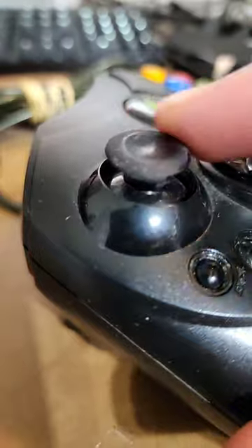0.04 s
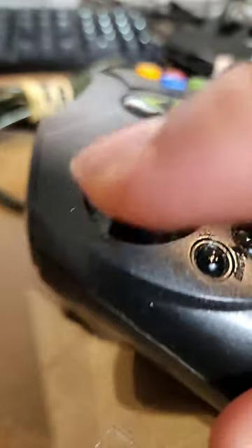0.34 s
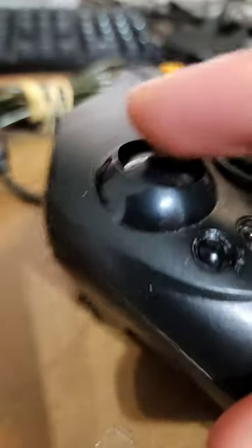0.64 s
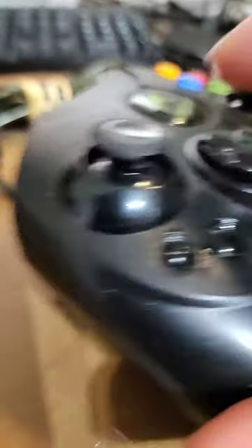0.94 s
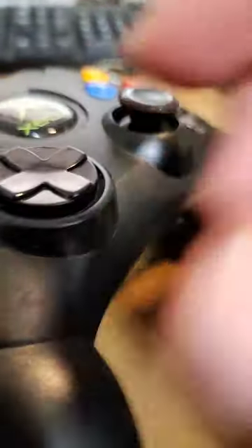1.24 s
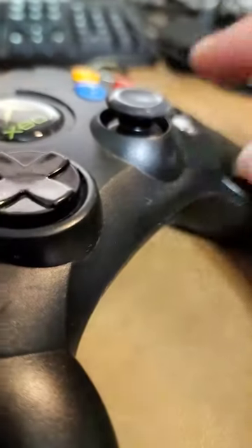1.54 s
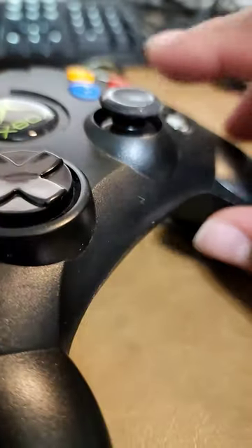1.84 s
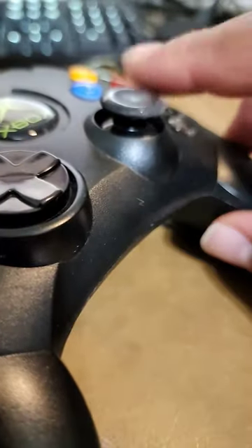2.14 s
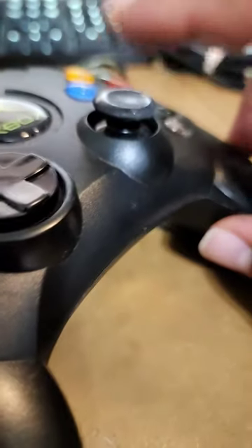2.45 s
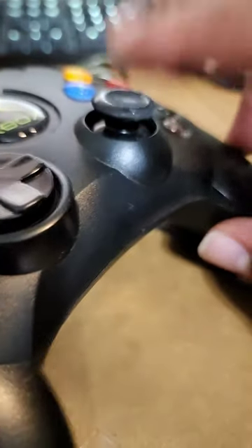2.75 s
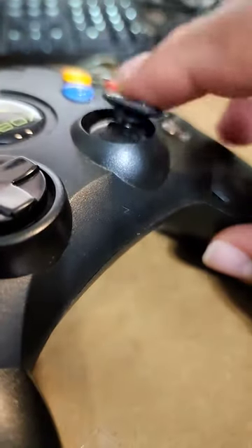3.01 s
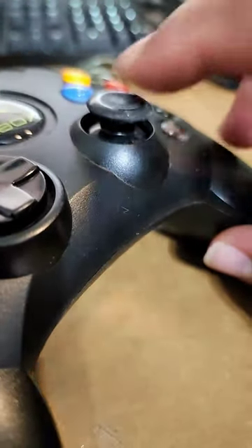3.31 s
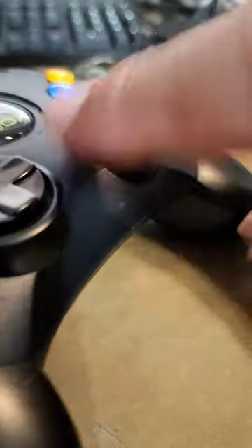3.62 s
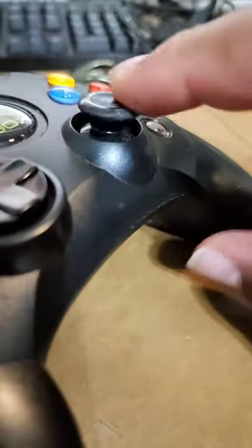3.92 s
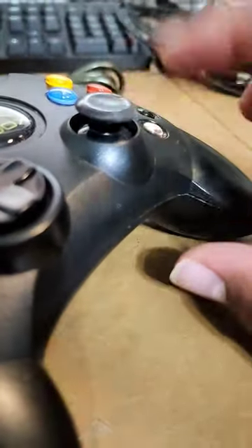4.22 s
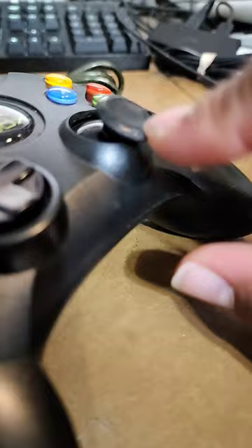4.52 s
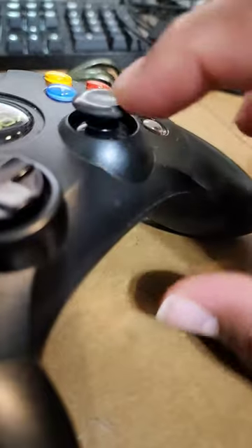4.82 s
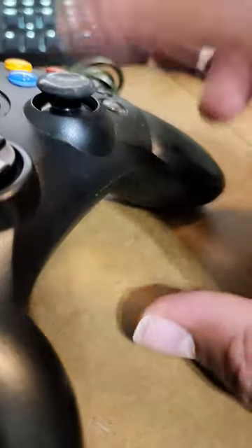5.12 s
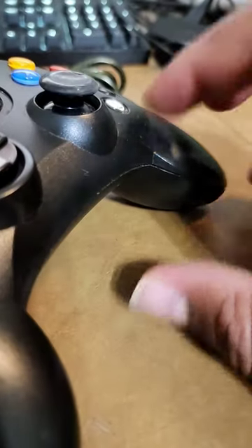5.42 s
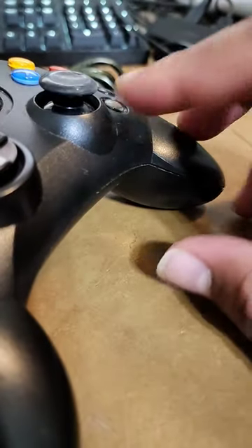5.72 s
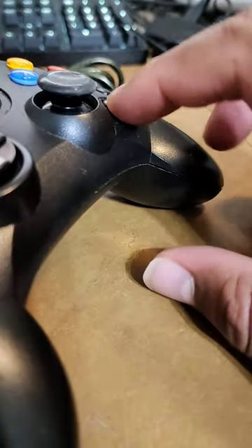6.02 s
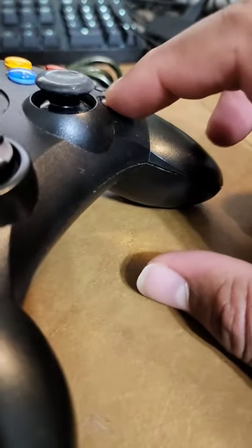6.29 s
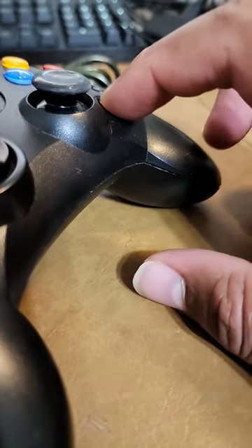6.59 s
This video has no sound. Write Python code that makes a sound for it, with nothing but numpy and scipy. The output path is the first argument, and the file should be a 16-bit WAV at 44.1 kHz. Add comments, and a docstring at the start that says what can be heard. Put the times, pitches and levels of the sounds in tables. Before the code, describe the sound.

A game controller is handled on a desk, close to a stereo microphone, in a quiet room with faint air noise and mains hum. At about 0.2 and 0.6 seconds a finger pushes a thumbstick with a short plastic clack; a little over a tenth of a second later, the stick snaps back with a tight chatter and a tiny spring ring. Light desk thumps accompany these. From 1 to 3 seconds it is much quieter: skin rubs and hisses over the casing, with a faint low rumble and a few soft hollow knocks. Five more push and release pairs come at about 3.1, 3.6, 4.1, 4.5 and 5.1 seconds, slightly left of centre, varying a little in pitch, the fourth strongest. The hand slides and scuffs softly until about 5.7 seconds. Between 6 and 6.3 seconds, finger and nail lightly tap the casing a few times.

```python
"""A game controller on a desk in a quiet room, close to a stereo microphone, over faint mains hum.
In the first second a finger pushes a thumbstick twice: each push clacks the plastic shell, and on each
release the sprung stick flies back and chatters. From 1 to 3 s skin rubs over the shell and the
controller knocks lightly on the desk. Five more pushes and releases follow from 3 to 5.2 s.
The hand then slides to a new hold, and just after 6 s finger and nail tap the casing."""
import sys
import numpy as np
from scipy import signal
from scipy.fft import rfft, irfft
from scipy.io import wavfile
from scipy.ndimage import uniform_filter1d

SR = 44100
rng = np.random.default_rng(int(sys.argv[2]) if len(sys.argv) > 2 else 0)


def inscribe(sig):
    """Save sig as 16-bit PCM at rate SR to the path in sys.argv[1].

    A 1-D sig is mono; a 2-D sig holds one channel per row.
    Samples are clipped to [-1, 1] before scaling.
    """
    pcm = np.round(np.clip(np.atleast_2d(sig).T, -1, 1) * 32767)
    wavfile.write(sys.argv[1], SR, pcm.astype(np.int16))


N = 297675

# Table levels are relative. Bands: low 650-1300 Hz, body to 2800 Hz, crack to 9500 Hz, tick above.
# stick pushes: (time [s], low [dB], body [dB], crack [dB], tick [dB], left-right [dB], pitch [ratio])
PUSHES = [(0.1701, -33.5, -22.5, -25.5, -35.5, -0.5, 1.19), (0.6118, -39.5, -18, -19.5, -35, -1, 1.25),
          (3.0701, -37, -25, -31, -55, 0.5, 1.085), (3.6024, -57, -27, -31, -52, 2.5, 1.14),
          (4.0743, -32.5, -22.5, -32.5, -52, 4, 0.903), (4.5208, -28, -16.5, -24, -32.5, 3.5, 1.06),
          (5.059, -38.5, -20, -27.5, -32.5, 4.5, 1.12)]
# finger and nail taps on the casing: columns as PUSHES
TAPS = [(.121, -55.5, -56, -60, -54, 2, 0.97), (0.2171, -53, -52, -61, -59, -1, 1),
        (0.7394, -52, -54, -48, -49, 1, 0.96), (2.052, -63, -59, -61.5, -80, 3.5, 0.98),
        (3.5532, -40, -44, -47.5, -35, 1.5, 1), (4.4815, -68, -51.5, -80, -67, 6, 0.86),
        (6.011, -56, -62.5, -61, -62, -4, 1), (6.0797, -62, -62, -56, -37, 7, 1),
        (6.0833, -41.5, -56, -46, -38.5, 8, 0.93), (6.1224, -36.5, -41.5, -43.5, -44, -0.5, 0.89),
        (6.2724, -38.5, -47.5, -44, -39, -1.5, 1)]
# stick releases: (columns as PUSHES, slip-off [dB re main hit], first bounce [dB re main hit],
# first bounce delay [s], scrape [dB], spring [dB], spring pitch [Hz])
RELEASES = [(0.2805, -42, -32, -30.5, -23, 1.5, 1.096, -8, -19, 0.0072, -45.5, -37.5, 2320),
            (0.7644, -36.5, -30, -37, -30.5, 3, 1.055, -7, 2.5, 0.0068, -44.5, -29, 2327),
            (3.1686, -31.5, -23, -28.5, -25.5, 5.5, 1.004, -25, -6, 0.0089, -44.5, -33, 1975),
            (3.6881, -35, -25, -35, -30, 4.5, .99, -31, -6, 0.0067, -54, -39, 1960),
            (4.1722, -33.5, -21.5, -35, -31.5, 4, .9, -9, -4, .0073, -38, -36.5, 1535),
            (4.6262, -39, -22, -34, -28, 4.5, .96, -16, -4.5, 0.0071, -45, -35, 2010),
            (5.1751, -36, -26, -34.5, -34, 6, 0.93, -24, -2, .0038, -50, -47, 2000)]
# controller on desk: (time [s], thump [dB], knock [dB], knock pitch [Hz])
KNOCKS = [(.216, -55, -45, 680), (0.2881, -34.5, -34, 534), (.318, -38.5, -48, 500), (.611, -49, -48, 241),
          (.852, -63, -52, 755), (1.197, -53.5, -43, 630), (2.519, -56.5, -54.5, 346),
          (2.737, -59, -43, 242), (2.796, -59, -50, 327), (3.5531, -36.5, -34.5, 560),
          (5.061, -58, -45.5, 197), (5.088, -63, -48.5, 557)]
# dense casing modes: (frequency [Hz], level [dB])
GRIT = [(400, 2.5), (750, -13.5), (1100, 7.5), (1800, 6.5), (3000, -6), (5000, -12), (9000, -20.5),
        (12500, -10), (15000, -28.5), (16200, -20)]


def amp(db):
    """Decibels to gain."""
    return 10 ** (np.asarray(db) / 20)


def unit(x):
    """Scale to rms 1."""
    return x / np.sqrt(np.mean(x ** 2) + 1e-20)


def pan(db):
    """Stereo gains for a left-right difference."""
    return amp(np.array([[.5], [-.5]]) * db)


def read(points, hz):
    """Interpolate on a log-frequency axis."""
    f, value = np.transpose(points)
    return np.interp(np.log(hz + 1), np.log(f + 1), value)


def add(mix, s, sound):
    """Mix in a stereo sound at time s."""
    part = mix[:, max(round(s * SR), 0):][:, :sound.shape[1]]
    part += sound[:, :part.shape[1]]


def coloured(points, size):
    """Stereo noise of a given spectrum, alike on both sides in the bass."""
    coherence = [(60, 0.85), (200, 0.79), (400, 0.5), (750, 0.048), (1300, 0.019), (16000, 0)]  # (frequency [Hz], left-right coherence [ratio])
    hz = np.fft.rfftfreq(size, 1 / SR)
    left, other = rfft(rng.standard_normal((2, size)))
    same = np.clip(read(coherence, hz), -1, 1)
    right = same * left + np.sqrt(1 - same ** 2) * other
    return unit(irfft(np.array([left, right]) * amp(read(points, hz)), size))


def flutter(depth_db, samples):
    """Random gain, rms 1, smoothed over the given span."""
    drift = unit(uniform_filter1d(rng.standard_normal(N), size=samples))
    return unit(amp(depth_db * np.tanh(drift)))


def background(air_db=-57.5, waver_db=1.7):
    """Steady room air and wavering mains hum."""
    air_colour = [(15, -50), (27, -27), (42, 5), (60, -21), (82, -12), (150, -10), (220, -13.5),
                  (310, -12.5), (520, -22.5), (850, -24), (1300, -18.5), (1850, -14.5), (2600, -26),
                  (3600, -35), (6000, -39.5), (9800, -44), (12600, -30), (15300, -45), (16000, -41)]  # (frequency [Hz], density [dB])
    hum_partials = [(59.9, -63), (119.8, -56.5), (239.6, -70)]  # (frequency [Hz], level [dB])
    t = np.arange(N) / SR
    waver = np.interp(t, np.linspace(0, t[-1], num=28), rng.standard_normal(size=28))
    hum = sum(amp(db) * np.sqrt(2) * np.sin(2 * np.pi * (f * t + rng.random())) for f, db in hum_partials)
    air = amp(air_db) * pan(1) * coloured(air_colour, N)
    return air + hum * amp(waver_db * waver) * amp([[2.5], [-3.5]])


def rumble():
    """Lumpy low rumble as the hand works on the desk."""
    colour = [(18, -26.5), (35, 6.5), (55, 5.5), (80, -16), (150, -8.5), (230, -16), (500, -38),
              (2000, -88)]  # (frequency [Hz], level [dB])
    envelope = [(0, -74), (.62, -54), (1.3, -62), (1.75, -55), (2.3, -58.5), (2.9, -69), (3.7, -61),
                (4.7, -55.5), (5.1, -64), (6.75, -75)]  # (time [s], level [dB])
    level_db = np.interp(np.arange(N) / SR, *np.transpose(envelope))
    lumps = flutter(depth_db=5, samples=2400)
    return coloured(colour, N) * lumps * amp(level_db) * pan(-.5)


def friction(strokes, colour, grain_db, gain_db, pan_db):
    """Surfaces catch and slip: grainy noise per stroke (peak [s], rise [s], fall [s], level [dB])."""
    t, speed = np.arange(N) / SR, np.zeros(N)
    for s, rise_s, fall_s, db in strokes:
        width_s = np.where(t < s, rise_s, fall_s)
        speed += amp(db) * np.exp(-.5 * np.minimum(((t - s) / width_s) ** 2, 20))
    return speed * flutter(grain_db, samples=160) * coloured(colour, N) * amp(gain_db) * pan(pan_db)


def hand(brush_rise=.73):
    """Slides rustle and rub through the casing, fingertips scuff it; skin hisses in both."""
    # changes of hold: (peak [s], rise [s], fall [s], rustle [dB], rub [dB], hiss [dB])
    slides = [(.37, 0.032, .055, -69, -57.5, -70), (1.16, 0.11, 0.1, -51, -66, -58.5),
              (1.34, 0.019, .048, -67, -70, -65), (1.51, 0.039, 0.1, -63.5, -55, -53.5),
              (1.75, .015, 0.056, -68, -58.5, -62), (5.14, 0.059, 0.071, -60, -68, -60),
              (5.315, 0.024, 0.026, -72, -59, -61.5), (5.415, 0.031, 0.062, -72, -58, -61)]
    # fingertip on shell: (peak [s], fall [s], scuff [dB], hiss [dB])
    brushes = [(2.52, 0.015, -66, -60.5), (2.64, 0.021, -55, -62.5), (2.81, 0.02, -68, -62),
               (3.289, 0.0084, -70, -61.5), (3.538, 0.056, -58, -65), (5.586, .006, -53, -71.5),
               (5.619, 0.017, -52, -65)]
    # friction spectra: (frequency [Hz], level [dB])
    rustle_colour = [(150, -16), (400, -4.5), (700, -2), (1200, -6.5), (2200, -10), (4000, -16.5),
                     (7000, -27.5), (16000, -27)]
    scuff_colour = [(400, -8.5), (850, -16.5), (1150, 3.5), (1800, -2), (3000, -15.5), (7000, -29.5),
                    (16000, -40)]
    rub_colour = [(90, -14), (200, -1), (350, 1.5), (500, -8.5), (800, -15), (2000, -15), (5000, -38.5)]
    hiss_colour = [(500, -20), (1500, -9), (4000, -15.5), (7000, -19), (10000, -17.5), (11500, 0.5),
                   (12700, 3.5), (15200, -4), (16000, -32)]
    rustles = [(*shape, db) for *shape, db, _, _ in slides]
    rubs = [(*shape, db) for *shape, _, db, _ in slides]
    scuffs = [(s, brush_rise * fall_s, fall_s, db) for s, fall_s, db, _ in brushes]
    hisses = [(*shape, db) for *shape, _, _, db in slides]
    hisses += [(s, brush_rise * fall_s, fall_s, db) for s, fall_s, _, db in brushes]
    return (friction(rustles, rustle_colour, grain_db=3, gain_db=0, pan_db=1.5)
            + friction(scuffs, scuff_colour, grain_db=6, gain_db=2.5, pan_db=5)
            + friction(rubs, rub_colour, grain_db=2.5, gain_db=3.5, pan_db=-1.5)
            + friction(hisses, hiss_colour, grain_db=3.5, gain_db=-2.1, pan_db=-15.5))


def scraping(push_db=-32.5, rattle_db=-14.5):
    """Plastic on plastic: stick in socket at each push and release, casing rattle at each knock."""
    strokes = [(s + .036, .016, .03, body_db + push_db) for s, _, body_db, *_ in PUSHES]
    strokes += [(s + .001, .01, .024, db) for s, *_, db, _, _ in RELEASES]
    strokes += [(s, .008, .025, thump_db + rattle_db) for s, thump_db, *_ in KNOCKS]
    return friction(strokes, GRIT, grain_db=5.5, gain_db=-1.5, pan_db=2.5)


def jolts():
    """Releases and taps jolt the desk in proportion to their low band; rows as KNOCKS."""
    return ([(s + .008, low_db - 21, low_db - 16, 580) for s, low_db, *_ in RELEASES]
            + [(s, low_db - 21, low_db - 11.5, 610) for s, low_db, *_ in TAPS])


def desk(knock_t60_s=.044, thump_gain_db=-11, knock_gain_db=-15, size=16384):
    """The controller rocks on the desk: low thump of the top, short hollow knock."""
    modes = [(65, -5, 0.19), (96, -5.5, 0.11), (117, 3.5, 0.27), (150.2, -0.5, 0.31), (179.7, -12, 0.13),
             (246, -13, 0.47), (305, -1.5, 0.11)]  # desk top: (frequency [Hz], level [dB], t60 [s])
    knock_colour = [(.15, -18), (.5, -1.5), (1, 3), (1.35, -1), (1.9, -19), (3.5, -16.5), (6, -21),
                    (16, -53.5)]  # (frequency [multiple of pitch], level [dB])
    t, out = np.arange(size) / SR, np.zeros((2, N))
    for s, thump_db, knock_db, hz in KNOCKS + jolts():
        thump = np.zeros(size)
        for f, db, t60_s in modes:
            detune = 1 + .022 * rng.standard_normal()
            thump -= amp(db - 60 * t / t60_s) * np.sin(2 * np.pi * f * detune * t)
        onset = 1 - np.exp(-(2 * hz * t) ** 2)  # duller knock, softer start
        noise = coloured([(k * hz, db) for k, db in knock_colour], size)
        knock = noise * onset * amp(-60 * t / knock_t60_s)
        hit = amp(thump_db + thump_gain_db) * unit(thump) + amp(knock_db + knock_gain_db) * unit(knock)
        add(out, s, hit * amp([[1.5], [-2]]))
    return out


def shell(contacts, rise_s, grit_db, grit_t60_s, damping, lag_s, upper_db, gain_db):
    """Contacts (rows as PUSHES) ring the shell; place and force set pitch and four band levels."""
    modes = [(1046, -12.5, 0.03), (1174, -14, 0.072), (1529, 3.5, 0.022), (1873, 1.5, 0.029),
             (2134, -1.5, 0.026), (2388, 3, 0.013), (3010, -9.5, 0.0291), (3520, -13, 0.036),
             (3940, -8.5, 0.011), (4850, -18.5, 0.0029), (5360, -14.5, 0.0096), (6050, -16.5, 0.0099),
             (7970, -18, 0.012), (11230, -19, 0.023), (11020, -28.5, 0.0095), (12300, -50.5, 0.053),
             (13850, -43.5, 0.006), (14000, -32, 0.039)]  # shell and stick: (frequency [Hz], level [dB], t60 at damping 1 [s])
    balance = [(700, 2.5), (1200, -1), (1750, 2), (2500, -5), (3700, -7.5), (5500, 3), (8000, 5),
               (10500, -4.5), (13000, -13)]  # (frequency [Hz], left-right [dB])
    edges_hz = [650, 1300, 2800, 9500, 30000]  # limits of the four bands [Hz]
    size, lead_s, upper_hz = 4096, .003, 4690
    t, hz = np.arange(size) / SR - lead_s, np.fft.rfftfreq(size, 1 / SR)
    age_s = np.maximum(t - np.array([[0], [lag_s]]), 0)  # right microphone port is farther off
    onset = 1 - np.exp(-(age_s / rise_s) ** 2)
    bands = np.diff([1 / (1 + (hz / edge) ** 12) for edge in edges_hz], axis=0)
    shelf = amp(upper_db * (1 - 1 / (1 + (hz / upper_hz) ** 8)))
    out = np.zeros((2, N))
    for s, *band_db, pan_db, pitch in contacts:
        ring = np.zeros((2, size))
        for f, db, t60_s in modes:
            phase = rng.random() + .16 * rng.standard_normal((2, 1))
            detune = 1 + .022 * rng.standard_normal()
            envelope = amp(db - 60 * age_s * damping / t60_s)
            ring += envelope * np.sin(2 * np.pi * (f * pitch * detune * age_s + phase))
        grit = coloured([(f * pitch, db) for f, db in GRIT], size) * amp(-60 * age_s / grit_t60_s)
        click = onset * (unit(ring) + amp(grit_db) * unit(grit))
        spectrum = rfft(click) * pan(read(balance, hz) + pan_db) * shelf
        add(out, s - lead_s, sum(amp(db) * unit(irfft(spectrum * band)) for db, band in zip(band_db, bands)))
    return amp(gain_db) * out


def taps():
    """Finger and nail strike the casing: fast onset, mostly dense modes."""
    return shell(TAPS, rise_s=.00019, grit_db=10.5, grit_t60_s=.012, damping=.83,
                 lag_s=.0001, upper_db=-.5, gain_db=-13)


def spring(delay_s=.004, size=16384):
    """The freed spring rings briefly after the stick comes home."""
    modes = [(0.592, -8.5, 0.067), (1.002, -0.5, 0.097), (1.839, -38, 0.25), (3.843, -8, 0.026),
             (5.39, -27.5, 0.051)]  # (frequency [multiple of pitch], level [dB], t60 [s])
    t, out = np.arange(size) / SR, np.zeros((2, N))
    for s, *_, spring_db, hz in RELEASES:
        ring = sum(amp(db - 60 * t / t60_s) * np.sin(2 * np.pi * k * hz * t) for k, db, t60_s in modes)
        add(out, s + delay_s, amp(spring_db) * np.array([ring, ring]))
    return out


def chatter(slip_s=.0065, dull_db=2.5, bounces=3, shrink=.7, loss_db=4.5):
    """The freed stick slips dully off the finger, hits home, then bounces ever quicker and weaker."""
    contacts = []
    for s, *band_db, pan_db, pitch, slip_db, bounce_db, gap_s, _, _, _ in RELEASES:
        band_db = np.array(band_db)
        contacts.append((s - slip_s, *(band_db + slip_db - dull_db * np.arange(4)), pan_db, pitch))
        contacts.append((s, *band_db, pan_db, pitch))
        for k in range(bounces):
            s += gap_s * shrink ** k
            contacts.append((s, *(band_db + bounce_db - k * loss_db), pan_db - 2, pitch))
    return shell(contacts, rise_s=.0007, grit_db=-3.5, grit_t60_s=.0117, damping=1,
                 lag_s=.00015, upper_db=3.5, gain_db=-13.5)


def pushes():
    """One clack per push; the finger on the stick damps the upper modes."""
    return shell(PUSHES, rise_s=.00096, grit_db=-5.5, grit_t60_s=.015, damping=2.7,
                 lag_s=.00013, upper_db=-3.5, gain_db=-13)


def room(dry, near_db=-13, near_t60_s=.068, tail_db=-19, size=16384):
    """Quick reflections off desk and hand, then a small room's tail."""
    decay = [(150, 0.69), (600, 0.5), (1800, 0.12), (5000, 0.31), (13000, 0.25)]  # (frequency [Hz], t60 [s])
    t = np.arange(size) / SR
    noise = rng.standard_normal((2, size)) * (t > .003)
    hz, frame_s, spectra = signal.stft(noise, SR, nperseg=256)
    fade = amp(-60 * frame_s / read(decay, hz)[:, None])
    tail = signal.istft(spectra * fade, SR, nperseg=256)[1][:, :size]
    near = rng.standard_normal((2, size)) * amp(-60 * t / near_t60_s) * (t > .002)
    response = (amp(near_db) * unit(near) + amp(tail_db) * unit(tail)) / np.sqrt(size)
    return dry + signal.fftconvolve(dry, response, axes=1)[:, :N]


def scene():
    """Clicks, scrapes and knocks in the room; hand, rumble and background without reverb."""
    handling = pushes() + chatter() + taps() + spring() + scraping() + desk()
    return room(handling) + hand() + rumble() + background()


def record(dry):
    """Microphone bass roll-off, then recorder band limit."""
    low_hz, high_hz = 36, 16100
    thinned = signal.sosfilt(signal.butter(4, low_hz, "highpass", fs=SR, output="sos"), dry)
    lowpass = signal.firwin(255, high_hz, window=("kaiser", 9), fs=SR)
    return signal.oaconvolve(thinned, lowpass[None], "same")


dry = scene()
out = record(dry)
inscribe(out)
```